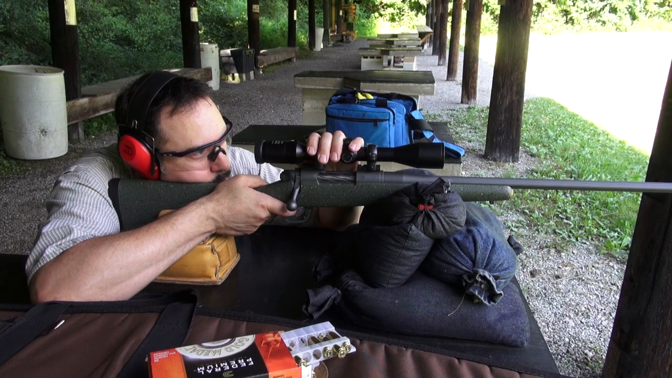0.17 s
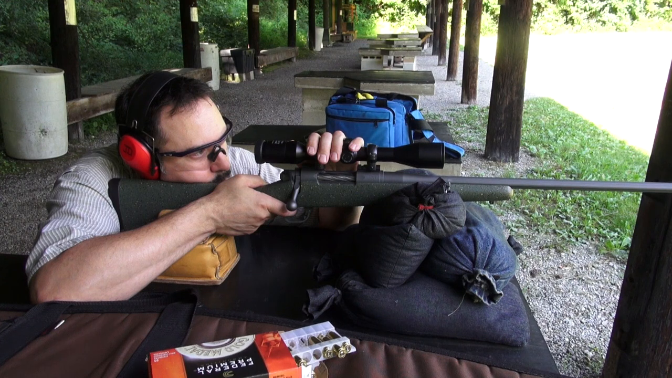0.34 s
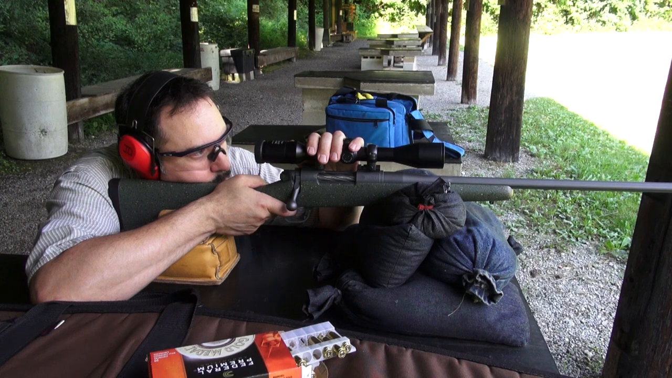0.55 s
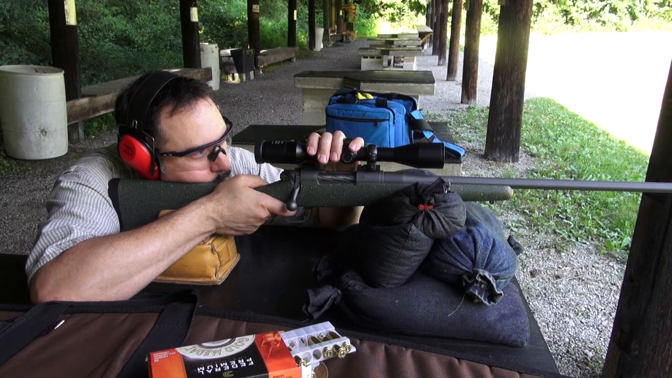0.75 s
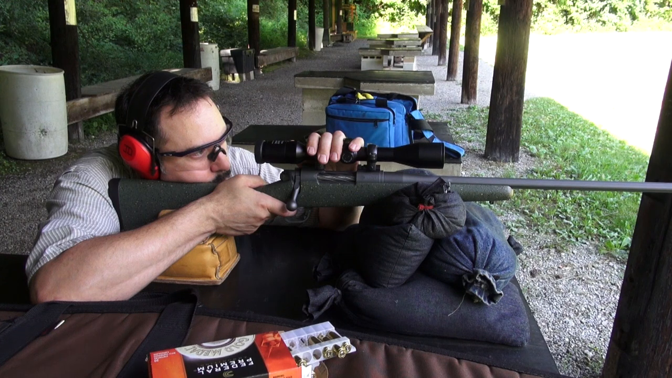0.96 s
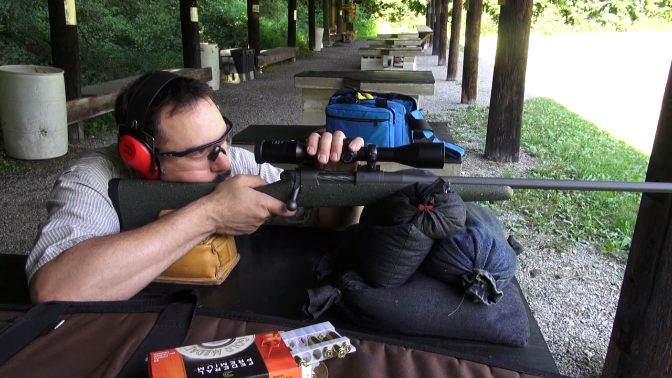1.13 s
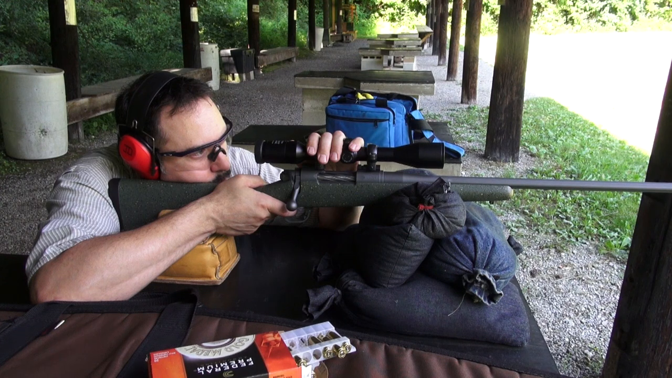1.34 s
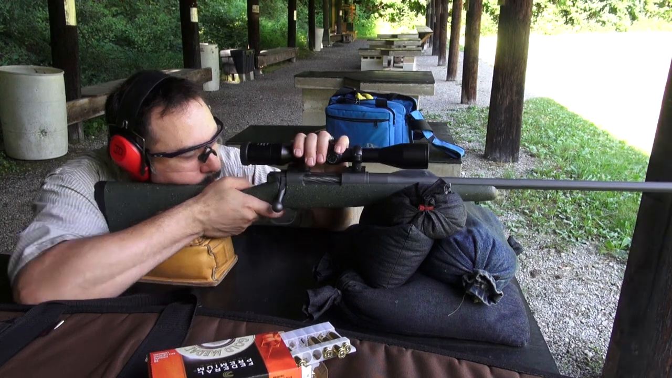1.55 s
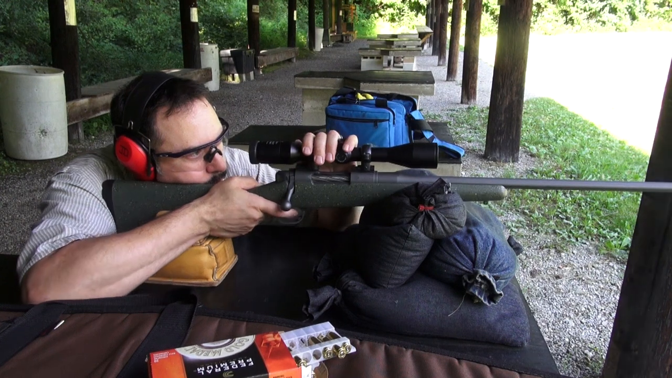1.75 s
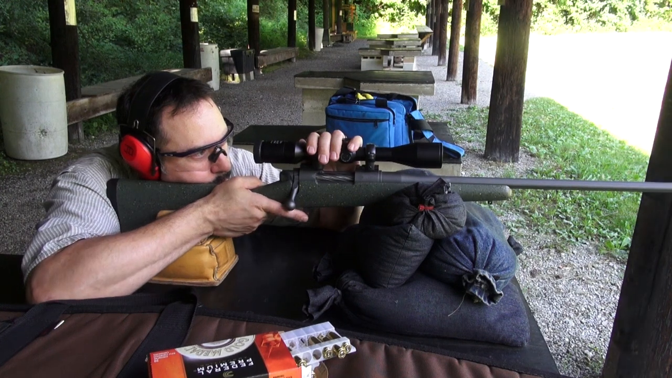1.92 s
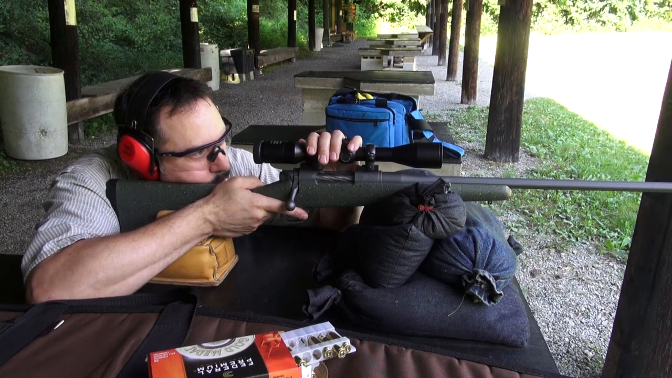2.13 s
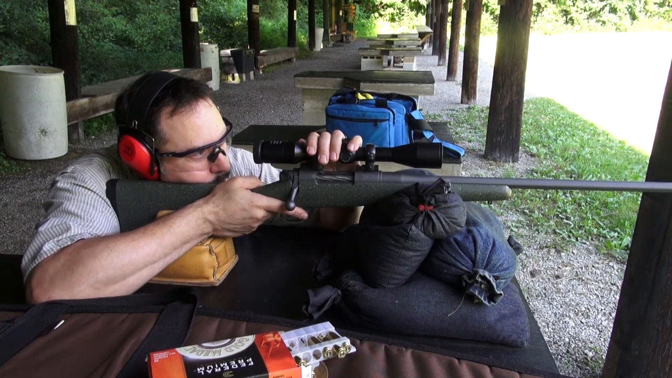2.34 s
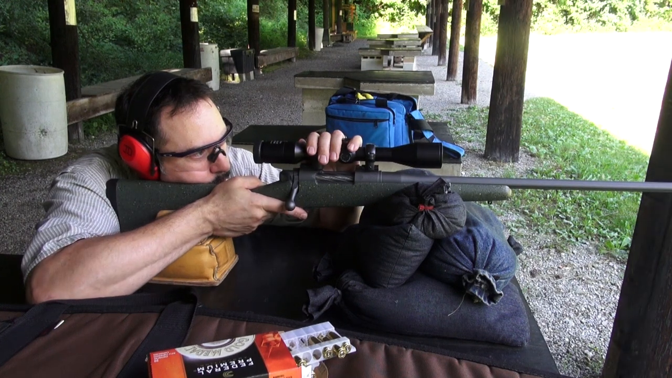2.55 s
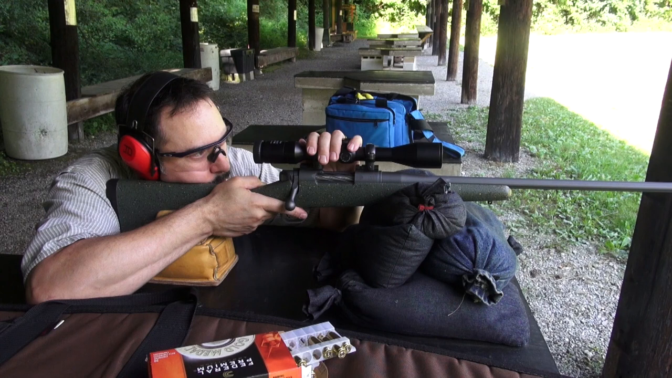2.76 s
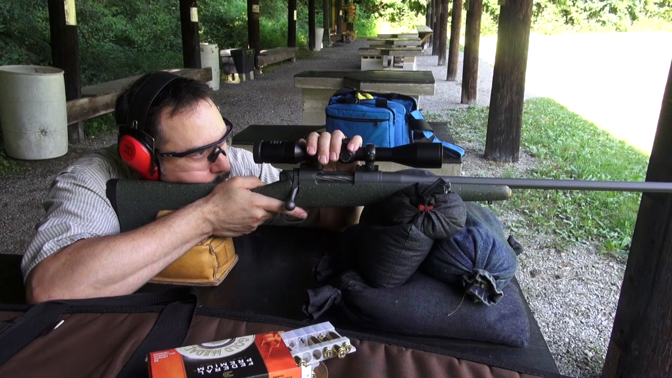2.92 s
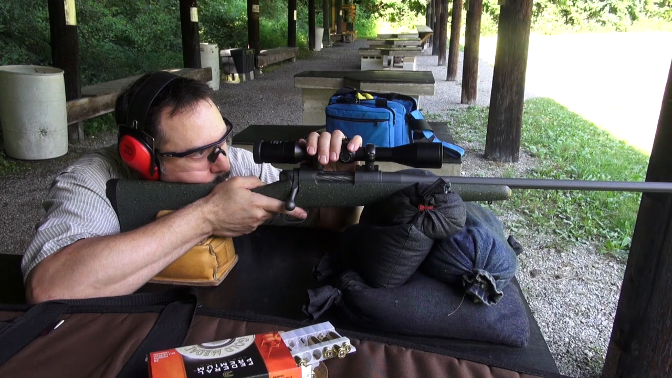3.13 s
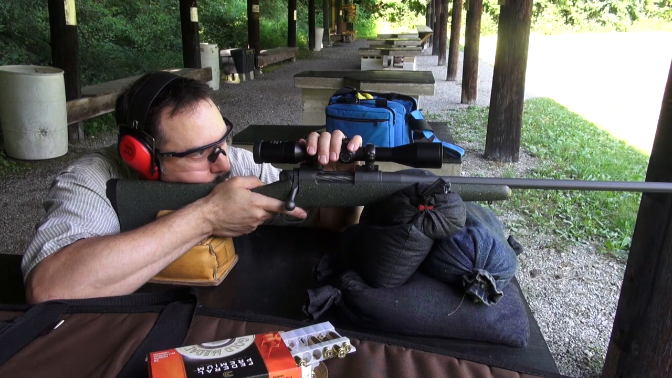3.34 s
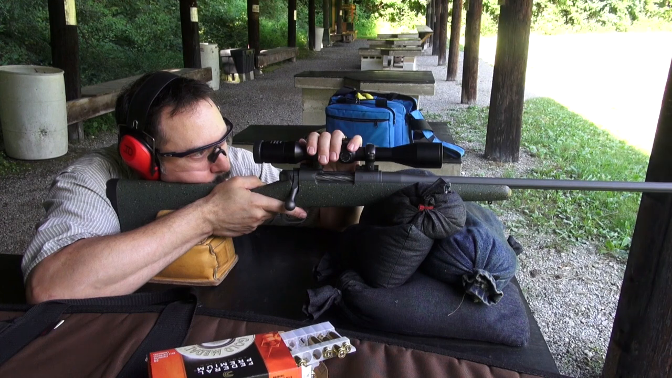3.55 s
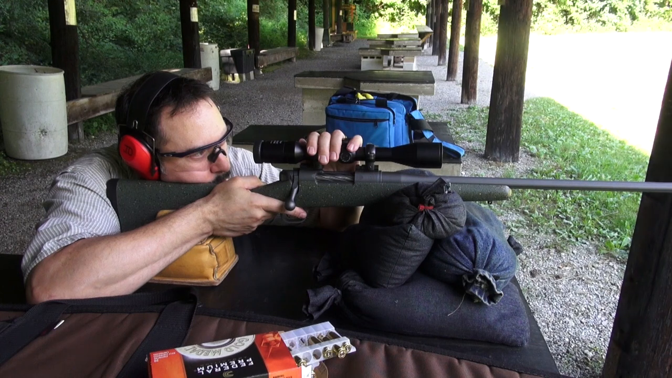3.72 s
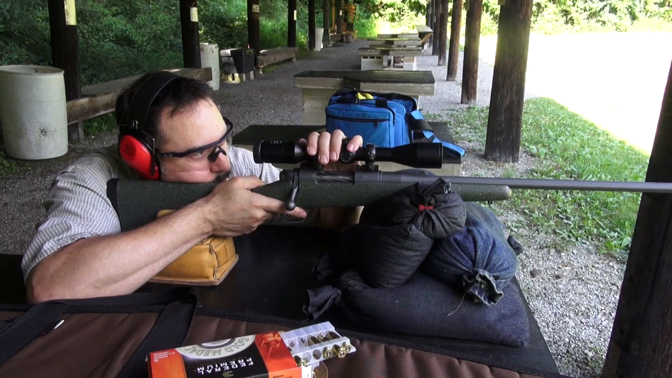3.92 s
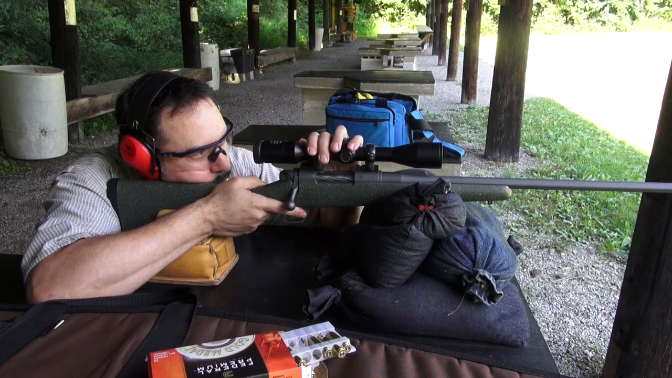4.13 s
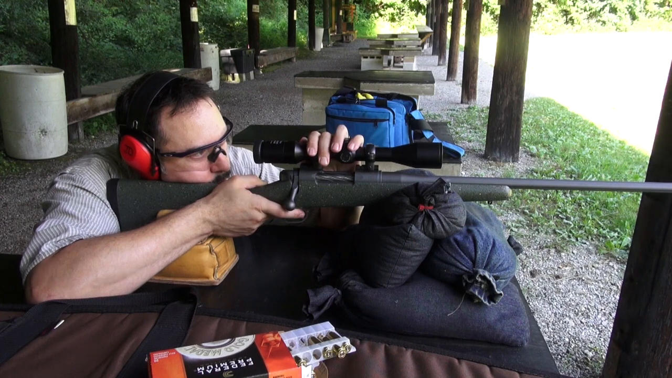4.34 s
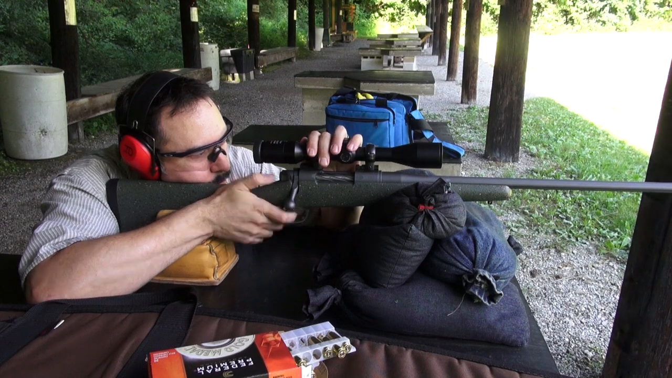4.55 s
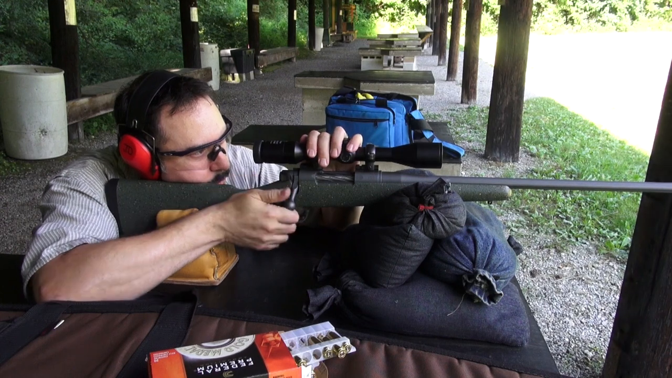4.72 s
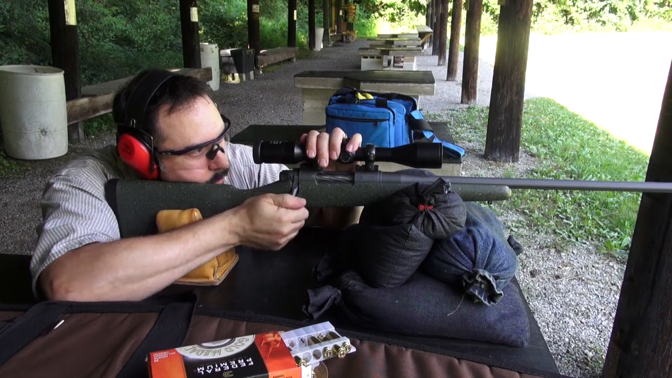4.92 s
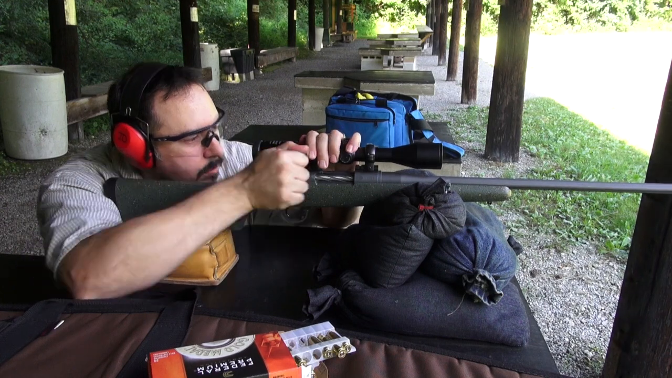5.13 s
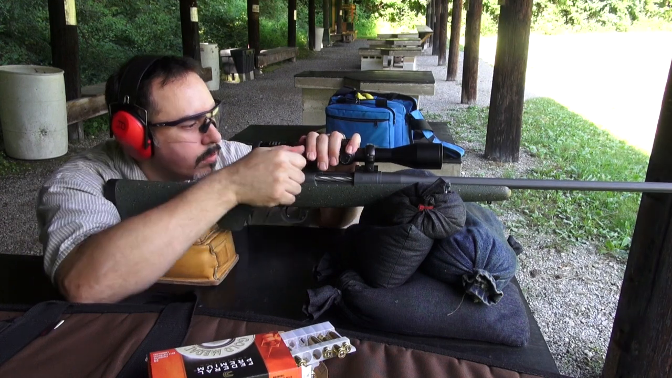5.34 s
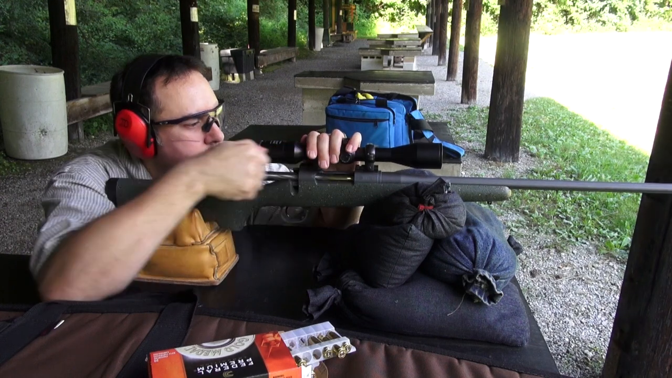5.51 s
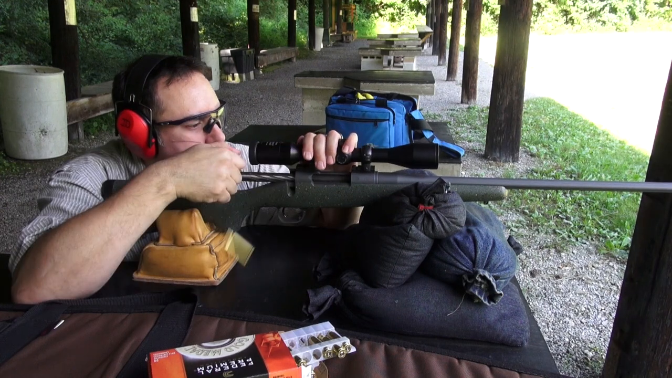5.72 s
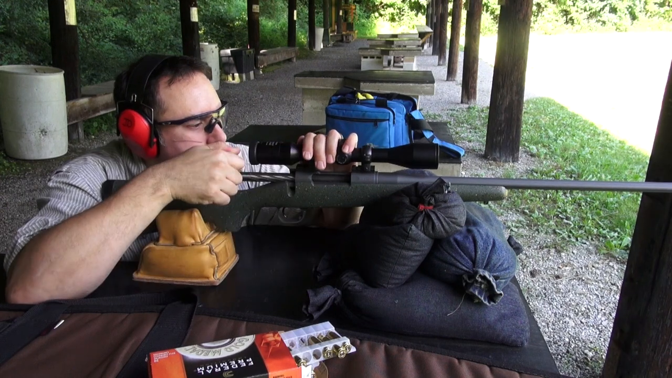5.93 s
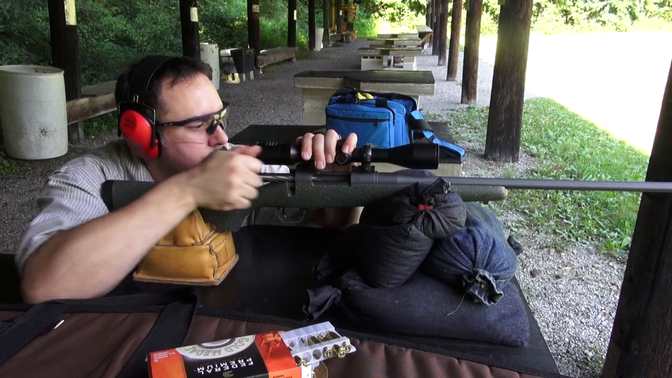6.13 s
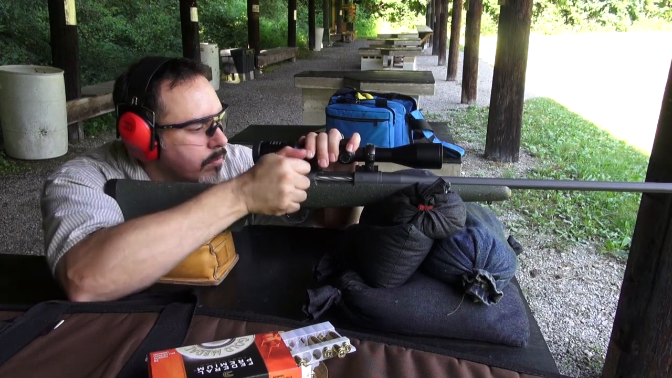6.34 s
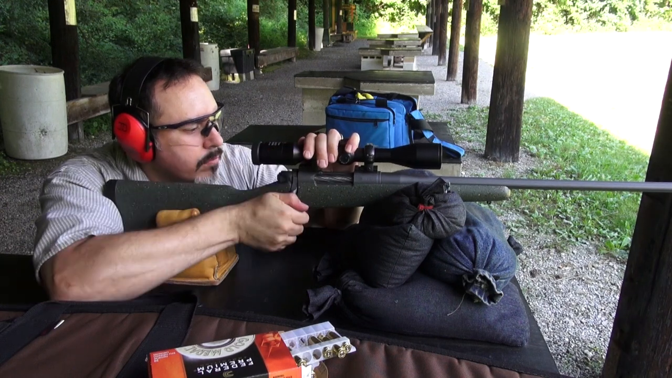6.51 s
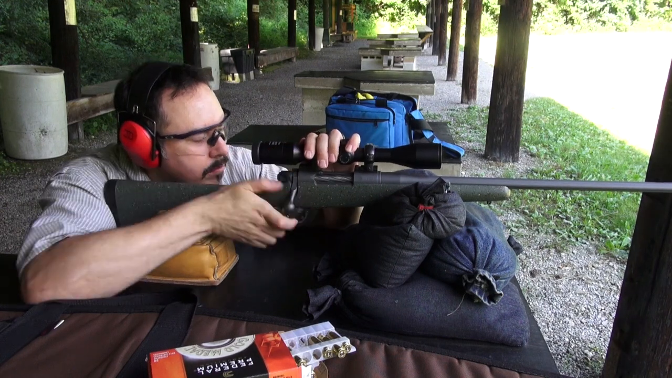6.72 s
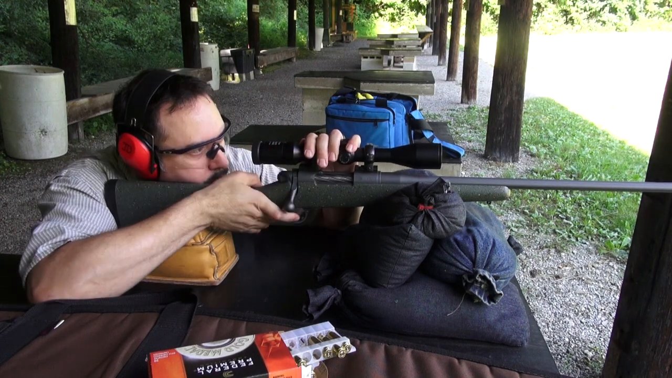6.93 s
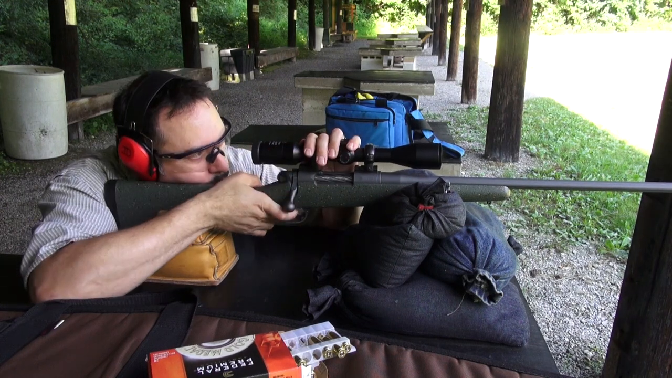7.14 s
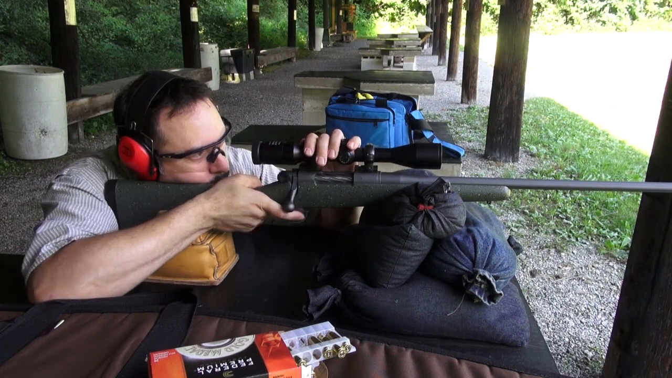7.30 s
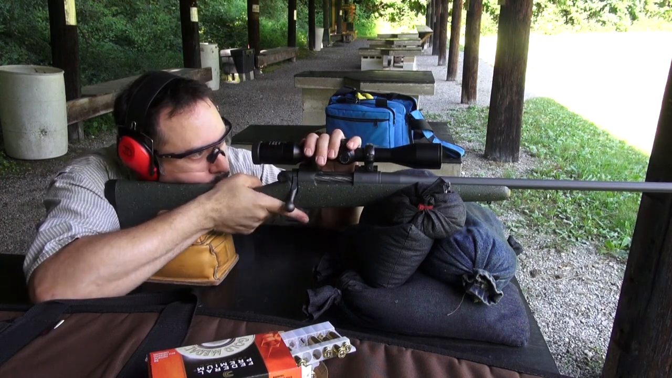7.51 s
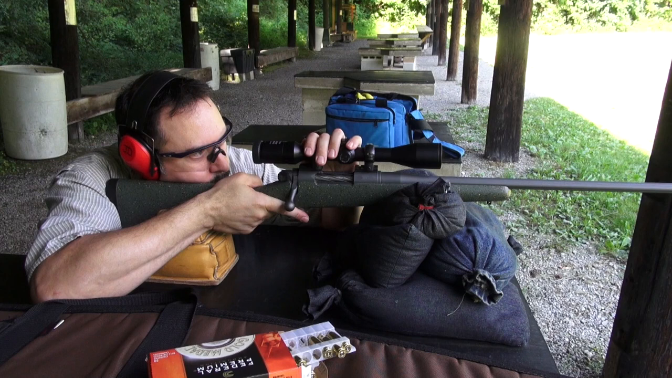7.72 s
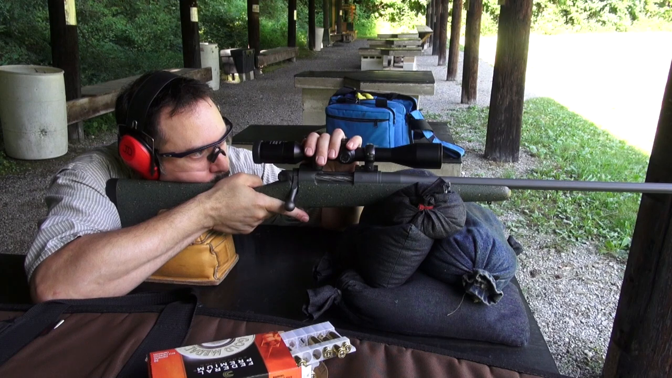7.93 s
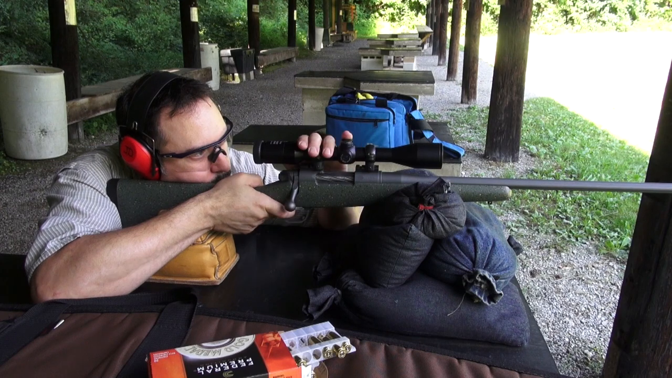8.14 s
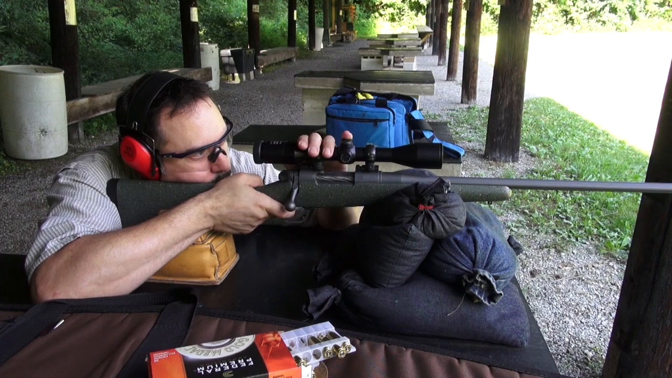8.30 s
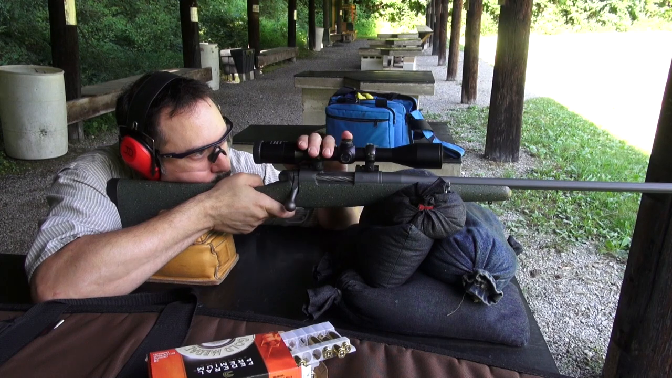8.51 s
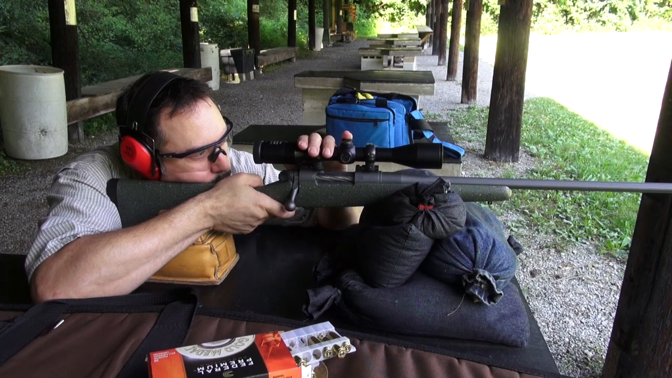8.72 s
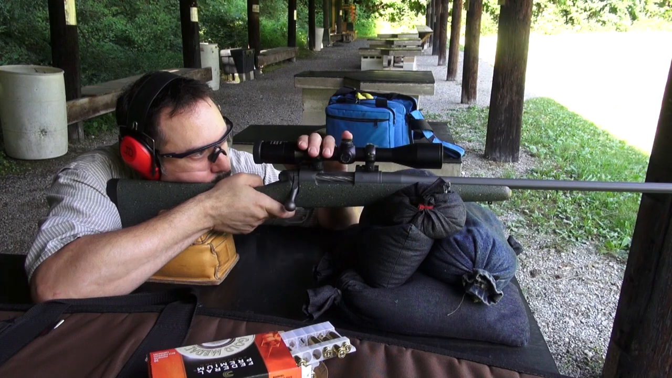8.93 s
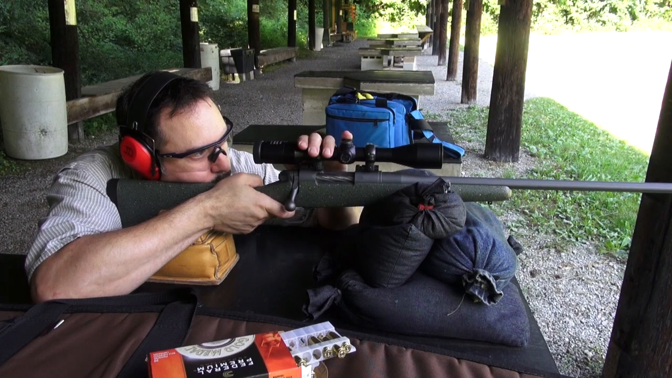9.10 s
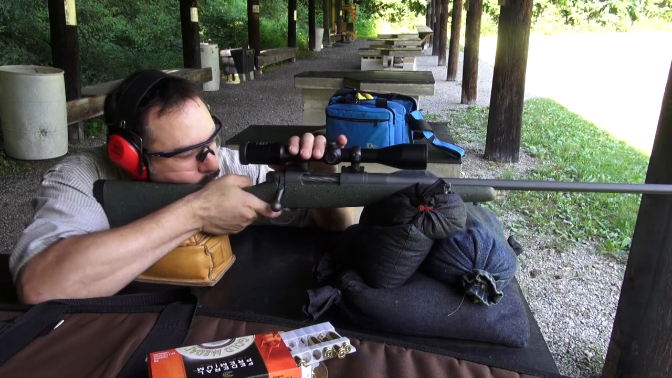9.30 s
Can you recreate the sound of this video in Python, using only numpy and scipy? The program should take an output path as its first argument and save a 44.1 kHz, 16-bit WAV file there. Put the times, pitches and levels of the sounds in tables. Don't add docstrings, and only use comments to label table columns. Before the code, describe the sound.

Outdoor covered firing line, close camera microphone. A rifle blasts early, clipped and violent, its echo swelling in the woods and rolling off distant slopes for seconds. Midway comes manual bolt work: scrape, metallic clacks, a bright brass ring, dull bench knocks, then a hard closing clack. Small bench touches and hissing insects lead into another identical blast, cut short while still echoing.

```python
import sys
import numpy as np
from scipy import signal
from scipy.fft import rfft, irfft, next_fast_len
from scipy.io import wavfile
from scipy.ndimage import uniform_filter1d, map_coordinates

SR = 44100
rng = np.random.default_rng(int(sys.argv[2]) if len(sys.argv) > 2 else 0)


def store_wav(level_fs):
    pcm = np.round(np.clip(np.atleast_2d(level_fs), -1, 1) * 32767)
    wavfile.write(sys.argv[1], SR, pcm.T.astype(np.int16))


def decibels_to_gain(level_db):
    exponent = np.asarray(level_db, float) / 20
    return 10 ** exponent


N = 417186

# (time [s], charge level [dB])
SHOTS = [
    (1.5199, -4.5),
    (9.2618, -4.5),
]
# (frequency [Hz], t60 [s])
SHELTER = [(100, 0.83), (300, 0.2), (600, .3), (1200, .3), (3000, 0.19), (6000, 0.22), (10000, 0.15),
           (15000, 0.1)]
# (frequency [Hz], width [Hz], level [dB])
STEEL_MODES = [(1886, 330, -3), (2401, 160, -6), (2996, 110, 0), (4816, 320, 1.5), (4972, 250, 0.5),
               (6888, 470, -3)]


def unit(x):
    return x / np.sqrt(np.mean(x ** 2) + 1e-20)


def along(points, hz):
    f, v = np.transpose(points)
    return np.interp(np.log(hz + 1), np.log(f + 1), v)


def filtered(x, response):
    m = next_fast_len(x.shape[-1] + 8192)
    return irfft(rfft(x, m) * response(np.fft.rfftfreq(m, 1 / SR)), m)[..., :x.shape[-1]]


def band(lo_hz, hi_hz, order=2):
    return lambda f: (1j * f / lo_hz / (1 + 1j * f / lo_hz) / (1 + 1j * f / hi_hz)) ** order


def modes(peaks):
    def response(f):
        total = 0
        for k, (hz, width, db) in enumerate(peaks):
            total = total + (-1) ** k * decibels_to_gain(db) * 1j * f * width / (hz * hz - f * f + 1j * f * width)
        return total
    return response


def noise(spectrum, size=N):
    return unit(filtered(rng.standard_normal(size), lambda hz: decibels_to_gain(along(spectrum, hz))))


def wobble(rate, size=N):
    return map_coordinates(rng.standard_normal(size // 64), [np.arange(size) * rate / SR])


def fading(spectrum, t60s, size):
    hz, t, z = signal.stft(noise(spectrum, size), SR, nperseg=256)
    decay = decibels_to_gain(-60 * t / along(t60s, hz)[:, None])
    return signal.istft(z * decay, SR, nperseg=256)[1][:size]


def add(track, s, sound):
    part = track[round(s * SR):][:len(sound)]
    part += sound[:len(part)]


def camera():
    # (frequency [Hz], level [dB per Hz])
    hiss = [(18, -37.5), (30, -8.5), (157, -7.5), (311, -6.5), (345, -9), (844, -6.5), (1010, -9.5),
            (1910, -17), (2610, -10.5), (6900, -6), (8980, -20), (13700, -22), (16000, -28.5)]
    # (frequency [Hz], rms level [dB])
    whines = [(845, -93), (1690, -98.5), (10729, -98), (13378, -91), (15149, -104)]
    step_hz = 50.25
    t = np.arange(N) / SR
    steps = np.diff(np.floor(step_hz * (t + 0.0011)), prepend=0) * decibels_to_gain(1.8 * wobble(30))
    ticks = unit(filtered(steps, modes([(122, 98, 8.0), (500, 160, -15.0)])))
    whine = sum(decibels_to_gain(db + 4.5 + 1.5 * wobble(5.6)) * np.sin(2 * np.pi * hz * t) for hz, db in whines)
    return decibels_to_gain(-74.0) * noise(hiss) + decibels_to_gain(-80.5) * ticks + whine


def jolts():
    # (time [s], level [dB], frequency [Hz], t60 [s])
    pushes = [
        (5.644, -62, 90.6, .06),
        (6.328, -43.5, 111, 0.032),
        (6.65, -70, 60, .15),
    ]
    out, t = np.zeros(N), np.arange(SR // 4) / SR
    for s, db, hz, t60 in pushes:
        add(out, s, decibels_to_gain(db - 60 * t / t60) * np.sin(2 * np.pi * hz * t))
    return out


def insects():
    # (time [s], level [dB])
    chorus = [(0, -66), (1.5, -65), (3, -79), (4, -72.5), (5.9, -68.5), (7, -70), (8, -67), (8.15, -69.5),
              (9.46, -72.5)]
    # (frequency [Hz], level [dB per Hz])
    colour = [(880, -52), (1500, -16), (2110, -17.5), (2300, -14), (2900, -5), (3340, -5), (6210, -4.5),
              (6890, 0.5), (8070, -11), (9090, -22.5), (10000, -27.5), (13000, -55), (22000, -120)]
    swell_db = np.interp(np.arange(N) / SR, *np.transpose(chorus))
    return decibels_to_gain(swell_db + .6 * wobble(7.1) + 0.6 * wobble(45)) * noise(colour)


def bench():
    # (time [s], peak level [dB], click level [dB], pitch [Hz])
    impacts = [(1.235, -70, 7, 2000), (4.563, -66, 5, 700), (5.088, -45.5, -20, 510),
               (5.199, -30.5, -16, 697), (5.8667, -47, 9.5, 680), (5.8844, -30, 0.5, 450),
               (5.9775, -27.5, -14, 628), (5.9957, -34.5, -26, 594), (6.008, -34.5, -23, 630),
               (6.574, -26, -15, 638), (7.122, -60, -23, 400), (7.677, -58.5, 9, 431),
               (7.845, -59, -13, 386), (8.008, -58, -9, 450)]
    out, t = np.zeros(N), np.arange(SR // 8) / SR
    decay = decibels_to_gain(-60 * t / 0.02)
    for (s, db, click_db, hz), grit in zip(impacts, rng.standard_normal((len(impacts), 2, len(t)))):
        wood = np.sin(2 * np.pi * hz * t) + 0.38 * np.sin(2 * np.pi * 1.6 * hz * t) * decay
        rattle = decibels_to_gain(-2.0) * filtered(grit[0] * decibels_to_gain(-60 * t / 0.06), band(400, 1650))
        click = filtered(grit[1] * decibels_to_gain(3 - 60 * t / 0.0026), band(150, 5200))
        add(out, s, decibels_to_gain(db + 7.0) * (wood * decay + decibels_to_gain(-6.5) * rattle + decibels_to_gain(click_db) * click))
    return filtered(out, band(326, 30000, order=3))


def case():
    # (frequency [Hz], partner frequency [Hz], t60 [s])
    pairs = [(9760, 9819, .24), (12800, 12845, .18), (14480, 14380, .15)]
    # (time [s], level of each of three modes [dB], share of the partner [0-1])
    blows = [
        (5.614, -34, -44.5, -60.5, 0.44),
        (5.632, -55, -45.5, -41, 0.47),
        (5.658, -50, -53.5, -44, 0.57),
        (5.674, -41, -49, -23, .35),
        (5.887, -59, -68, -67, 0.11),
        (5.978, -75, -74, -80, 0.23),
    ]
    out, t = np.zeros(N), np.arange(SR // 2) / SR
    for (s, *levels, share), phases in zip(blows, rng.uniform(0, 2 * np.pi, (len(blows), 3))):
        for (hz, partner_hz, t60), db, phase in zip(pairs, levels, phases):
            pair = np.sin(2 * np.pi * hz * t) + share * np.sin(2 * np.pi * partner_hz * t + phase)
            add(out, s, decibels_to_gain(db - 60 * t / t60) * pair)
    return out * decibels_to_gain(2.2 * wobble(35))


def slide():
    # (start time [s], length [s], level [dB])
    strokes = [(5.02, .13, -70.5), (5.17, .04, -58), (5.494, .014, -58.5), (5.55, 0.0074, -51),
               (5.574, 0.011, -54.5), (5.606, .012, -50.5), (5.62, 0.047, -42.5), (6.195, .03, -43.5),
               (6.24, .015, -40), (6.255, .04, -34.5), (6.32, .04, -52.5), (6.484, .008, -53)]
    # (frequency [Hz], level [dB per Hz])
    rails = [(200, -41), (500, -5.5), (1200, -9), (1700, -5), (2200, -1), (3300, -5.5), (4600, 2),
             (5500, -4.5), (6500, -8), (9000, -35), (14000, -46)]
    grip_db_per_s, let_go_db_per_s, edge_db = 1499.5, 456.5, -12
    t = np.arange(N) / SR
    scrape = decibels_to_gain(3.8 * wobble(500) + 2.7 * wobble(71)) * noise(rails)
    rub = unit(filtered(scrape, lambda f: 1.1 + modes(STEEL_MODES)(f)))
    edge = unit(decibels_to_gain(4.4 * wobble(500)) * noise([(4000, -27), (8000, 4.5), (16000, -7)]))
    level = np.zeros(N)
    for s, length, db in strokes:
        onset_db = grip_db_per_s * np.maximum(s - t, 0)
        release_db = let_go_db_per_s * np.maximum(t - s - length, 0)
        level += decibels_to_gain(db - onset_db - release_db)
    return level * (rub + decibels_to_gain(edge_db) * edge)


def bolt():
    # (time [s], peak level [dB], strongest resonance [Hz], bright click level [dB])
    opening = [(4.775, -59, 5070, 0), (4.868, -56.5, 5990, -5.5), (4.908, -57, 5160, -9),
               (5.0593, -39, 3020, -9.5), (5.0855, -45, 3940, 3.5), (5.162, -33.5, 2450, -2.5),
               (5.1808, -37, 1910, -24), (5.1875, -17, 4000, -13), (5.192, -33, 4200, -13.5),
               (5.1956, -15.5, 3820, -7.5), (5.467, -51, 2460, -1.5), (5.5356, -19.5, 4160, -13),
               (5.6131, -24.5, 4620, 1.5), (5.617, -25, 2910, 1), (5.6231, -21, 4600, -2),
               (5.6311, -17.5, 3380, -3), (5.6425, -10, 3140, -4.5), (5.6712, -31.5, 3220, 8)]
    # (time [s], peak level [dB], strongest resonance [Hz], bright click level [dB])
    closing = [(6.168, -46, 4950, 0), (6.1872, -23.5, 4550, -3), (6.201, -26.5, 4500, -12),
               (6.2116, -34.5, 1970, -6), (6.2433, -24.5, 4640, -6.5), (6.2553, -17, 3730, 2),
               (6.261, -20, 4420, -2), (6.2675, -13.5, 3420, -4), (6.271, -18, 4820, 5),
               (6.2853, -22.5, 4000, -3.5), (6.291, -34, 3860, 2), (6.3136, -33.5, 2760, -11.5),
               (6.3294, -3, 4508, -3), (6.339, -23, 3300, -14), (6.459, -44, 1850, -20),
               (6.4832, -29.5, 3100, -38), (6.572, -19.5, 2405, -4)]
    # (frequency [Hz], width [Hz], level [dB])
    stock = [(450, 270, -4), (623, 242.8, -1), (1190, 502, 0.5)]
    t60 = 0.013
    rebound_s, rebound_db, rebound_per_db = .0028, -3, 0.52
    stock_db, stock_per_db = -12, -0.02
    stop_s, stop_db = 5.6425, 8
    out, t = np.zeros(N), np.arange(SR // 4) / SR
    contacts = opening + closing
    direct = decibels_to_gain(-60 * (t / t60 / np.array([[.75], [.75], [1.3], [.65]])) ** 1.3) * (1 - np.exp(-t / .0001))
    roof = decibels_to_gain([[-26], [-22], [-29]] - 60 * t / np.array([[.24], [.28], [.15]])) * (1 - np.exp(-t / .004))
    for (s, db, hz, bright_db), draw in zip(contacts, rng.standard_normal((len(contacts), 5, len(t)))):
        knock_db = stock_db + stock_per_db * db + stop_db * (abs(s - stop_s) < .005)
        grit = decibels_to_gain(4 * unit(uniform_filter1d(draw[4], size=12)))
        blow = grit * direct
        blow = blow + decibels_to_gain(rebound_db + rebound_per_db * db) * np.roll(blow, round(rebound_s * SR), axis=1)
        burst = np.vstack([draw[0] * blow[0], draw[1:4] * (roof + [[0], [1], [1]] * blow[1:])])
        ring = modes([(hz, 600, 9), (3800, 4000, -2)])

        def bodies(f):
            steel = (ring(f) + decibels_to_gain(4.0) * modes(STEEL_MODES)(f)) * band(1300, 8000)(f)
            wood = modes(stock)(f) * band(400, 2500, order=3)(f)
            return np.array([steel, decibels_to_gain(1.0) * band(1500, 7000)(f), wood, band(7500, 12000, order=4)(f)])

        parts = filtered(burst, bodies)
        parts = np.array([parts[0] + parts[1], parts[2], parts[3]])
        parts /= np.sqrt(np.mean(parts[:, :200] ** 2, axis=1, keepdims=True))
        mixed = parts[0] + decibels_to_gain(knock_db + 0.3) * parts[1] + decibels_to_gain(bright_db + 0.94) * parts[2]
        add(out, s, decibels_to_gain(db - 10.0) * mixed)
    return out


def slopes(t):
    # (frequency [Hz], level [dB per Hz])
    valley = [(59, -45), (120, -18), (250, -22), (400, -7), (550, -1), (850, -7.5), (1300, -8.5),
              (2000, -12.5), (3400, -30), (5200, -60), (8800, -120)]
    # (frequency [Hz], t60 [s])
    far = [(150, 1.7), (400, 2.2), (600, 2.6), (1000, 2.4), (1800, 1.9), (3000, 2.4)]
    size = len(t)
    return decibels_to_gain(-21.5 + .5 * wobble(25, size)) * fading(valley, far, size) * (1 - np.exp(-t / 0.16))


def woods(t):
    # (frequency [Hz], level [dB per Hz])
    trees = [(50, -60), (85, -44), (115, -19), (200, -13), (330, -3), (640, -1), (1140, -12), (2000, -15),
             (3500, -15.5), (6700, -21.5), (10000, -28), (13000, -30.5), (16000, -34.5)]
    # (frequency [Hz], t60 [s])
    decay = [(100, 1.2), (250, 0.57), (600, 0.86), (1500, 1.1), (3000, 1), (5000, .95), (7500, 1),
             (10000, 0.85), (13000, 0.62), (16000, .5)]
    first_s, spread_s, clearing_db = .09, .018, -13
    front_db, front_s, farther_db_per_s = 2.5, 0.056, 3
    leaves_s, leaves_db_per_s2 = .2, -30
    size = len(t)
    rows_db = clearing_db / (1 + np.exp(np.minimum(t - first_s, 1) / spread_s))
    rows_db = rows_db + 2.0 + farther_db_per_s * t
    rows_db += front_db * np.exp(-((t - first_s - front_s) / front_s) ** 2)
    rows_db += .7 * wobble(33, size) + 0.99 * wobble(300, size)
    leaves_db = .6 * rows_db - 4.0 + leaves_db_per_s2 * (t - leaves_s) ** 2
    echo = fading(trees, decay, size)
    trunks = filtered(echo, lambda f: 1 / (1 + (f / 4500) ** 4))
    return decibels_to_gain(0.5) * (decibels_to_gain(rows_db) * trunks + decibels_to_gain(leaves_db) * (echo - trunks))


def muzzle(t):
    # (frequency [Hz], level [dB per Hz])
    under_roof = [(60, -39.5), (150, -21), (300, -1.5), (600, 2.5), (1200, -4), (3000, -6.5), (7000, -13.5),
                  (12000, -17.5), (16000, -19)]
    size = len(t)
    blast = decibels_to_gain(6.0) * (1 - t / 0.00016) * np.exp(-t / 0.0012)
    jet = noise([(1500, -18), (3000, -2), (6500, 0), (10000, -7), (16000, -16)], size)
    crack = decibels_to_gain(19 - 60 * t / .022) * jet
    roof = decibels_to_gain(14.5 + 1.5 * wobble(150, size)) * fading(under_roof, SHELTER, size)
    return blast + crack + roof


def shots():
    out, t = np.zeros(N), np.arange(3 * SR) / SR
    for s, db in SHOTS:
        lead_in = decibels_to_gain(-8) * rng.standard_normal(300) * np.exp(np.arange(-300, 0) / SR / .0009)
        add(out, s - 300 / SR, decibels_to_gain(db) * lead_in)
        add(out, s, decibels_to_gain(db) * (muzzle(t) + woods(t) + slopes(t)))
    return out


def scene():
    brass = bench() + case()
    tail = fading([(200, -14.5), (600, -8.5), (1500, -5), (6000, -4.5), (15000, -21.0)], SHELTER, SR // 2)
    roof = signal.fftconvolve(brass, np.pad(tail / np.linalg.norm(tail), (250, 0)))[:N]
    air = insects() + slide() + bolt() + brass + decibels_to_gain(-19.5) * roof + shots()
    return np.array([air, air])


def roll_off(x):
    return signal.sosfilt(signal.butter(12, 16220, fs=SR, output="sos"), x)


def record(dry):
    # (centre time [s], half length [s], level [dB])
    dropout = (1.652, .03, -6.5)
    t = np.arange(N) / SR
    saturated = dry / (1 + np.abs(dry / 1.05) ** 6) ** (1 / 6)
    since = [np.maximum(t - s, 0) for s, _ in SHOTS]
    duck_db = sum(-10 * (np.exp(-u / 0.94) - 0.98 * np.exp(-u / 0.029)) for u in since)
    sag = sum(decibels_to_gain(-36) * (np.exp(-u / .35) / 4 - np.exp(-u / .04)) * (u > 0) for u in since)
    passband = lambda f: band(110, 60000, order=3)(f) / (1 + (f / 15800) ** 40)
    coupled = filtered(saturated * decibels_to_gain(duck_db), passband) + sag + camera() + jolts()
    apart = decibels_to_gain(-35) * filtered(coupled[0], lambda f: 1j * np.sign(f))
    centre_s, half_s, dip_db = dropout
    stumble = decibels_to_gain(np.outer([0, dip_db], np.exp(-((t - centre_s) / half_s) ** 6)))
    return roll_off(np.clip(stumble * (coupled + [apart, -apart]), -1, 1))


dry = scene()
out = record(dry)
store_wav(out)
```